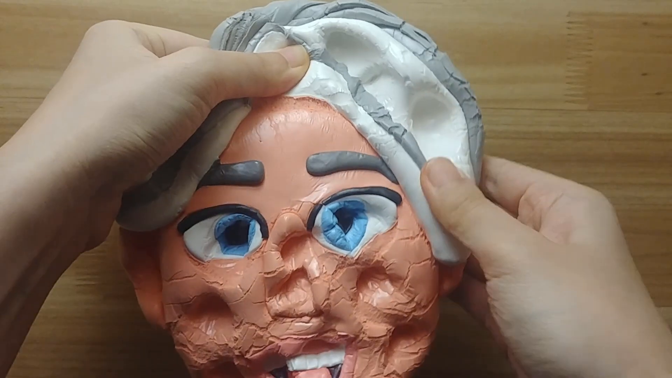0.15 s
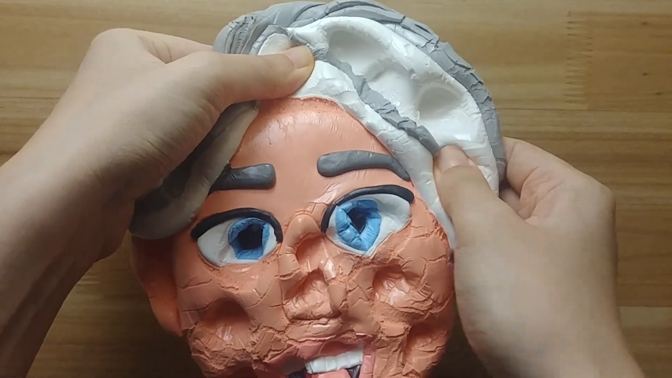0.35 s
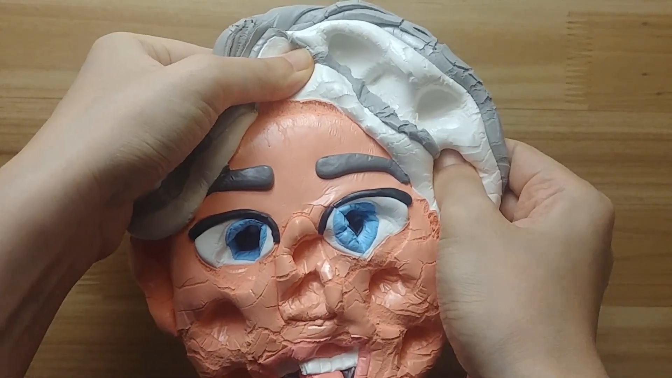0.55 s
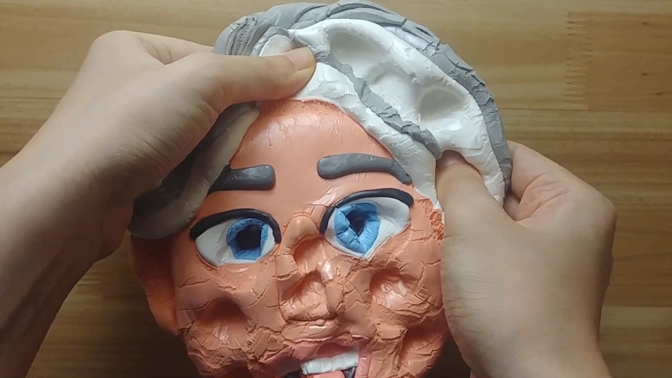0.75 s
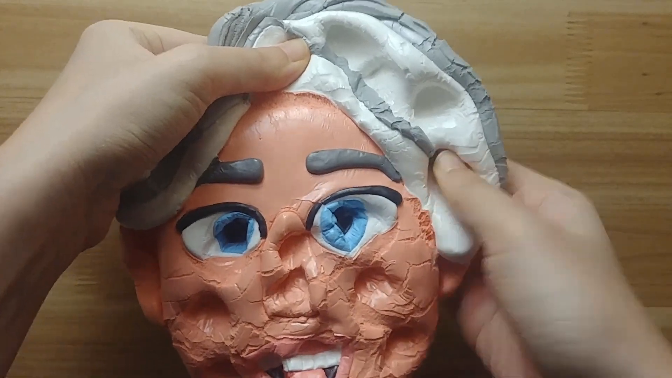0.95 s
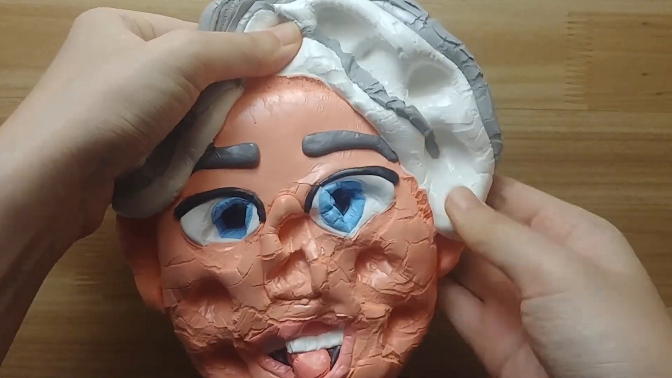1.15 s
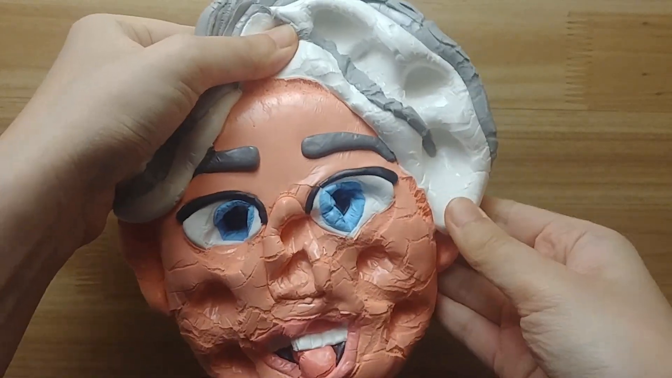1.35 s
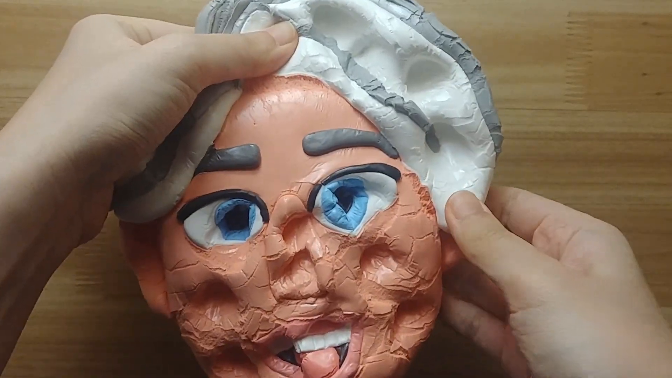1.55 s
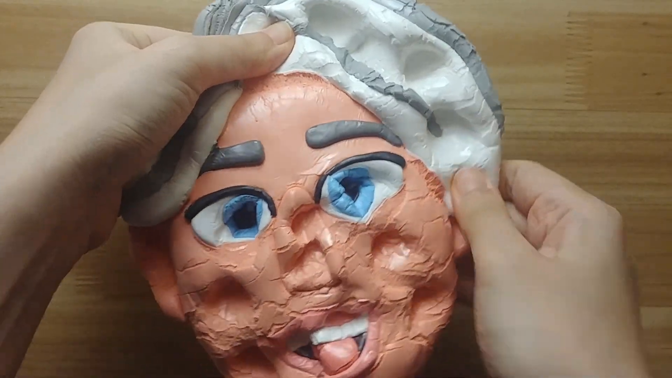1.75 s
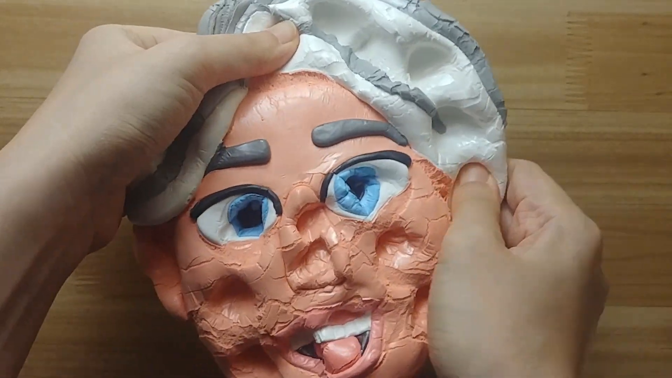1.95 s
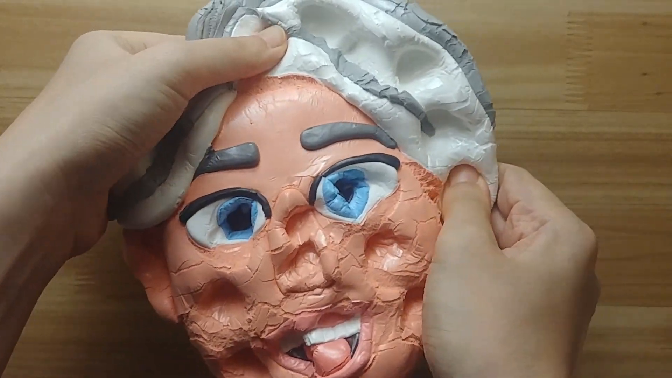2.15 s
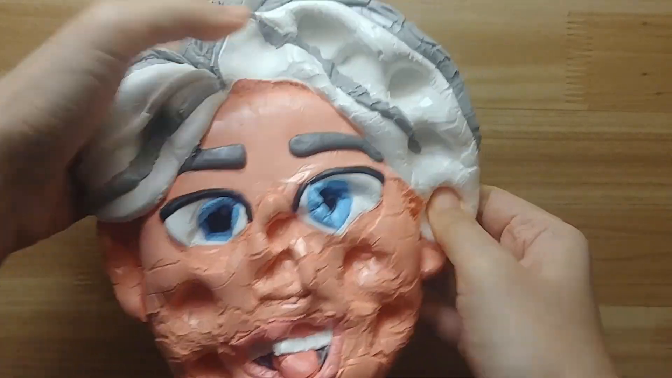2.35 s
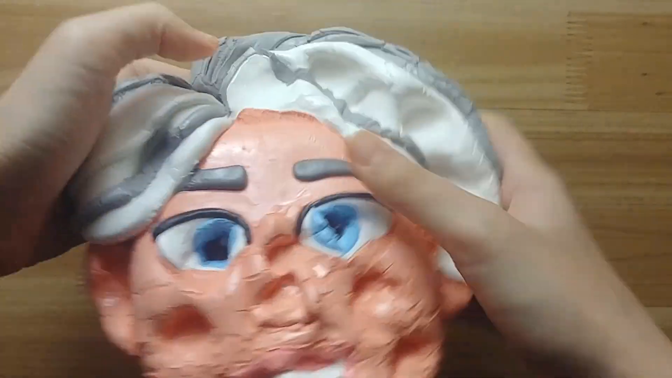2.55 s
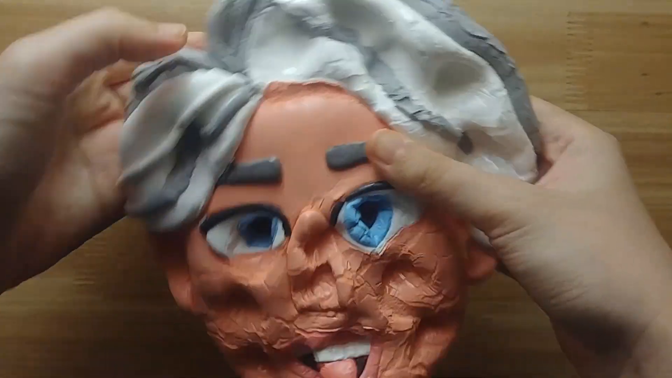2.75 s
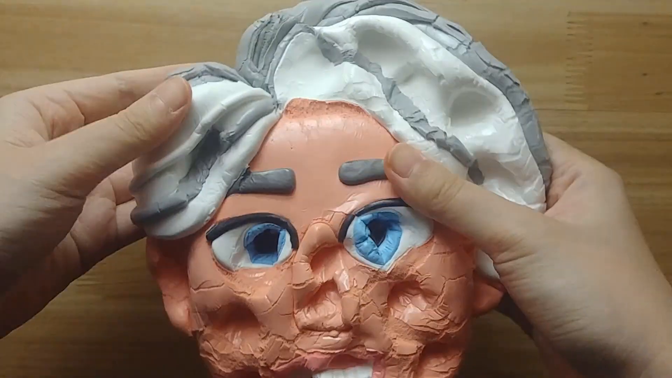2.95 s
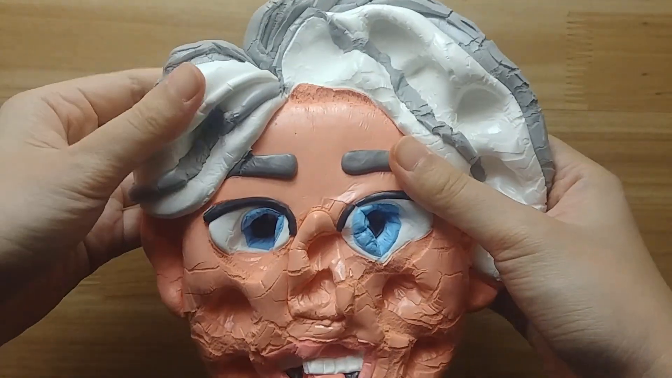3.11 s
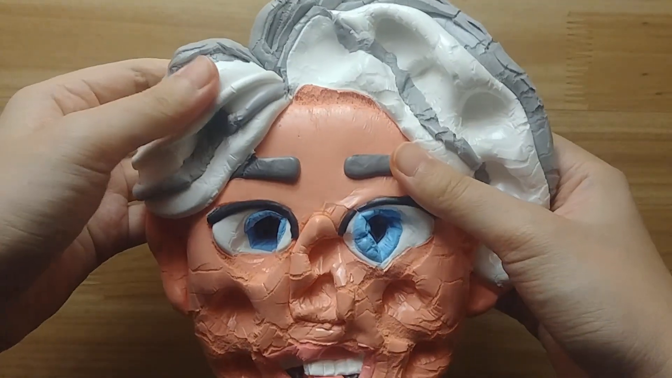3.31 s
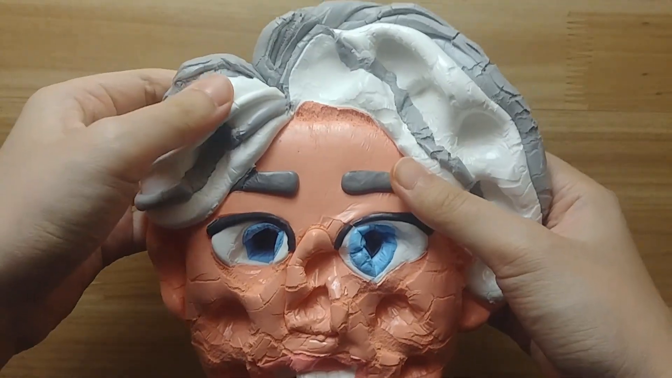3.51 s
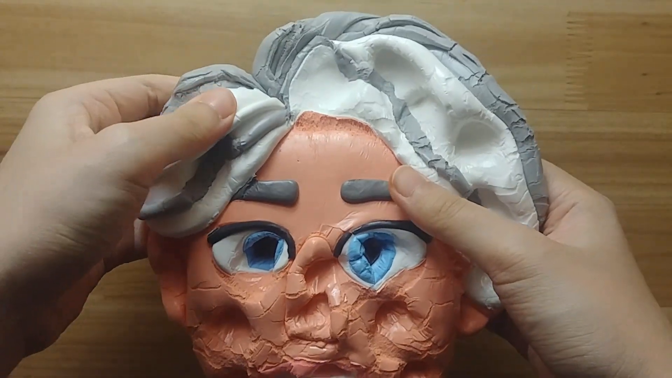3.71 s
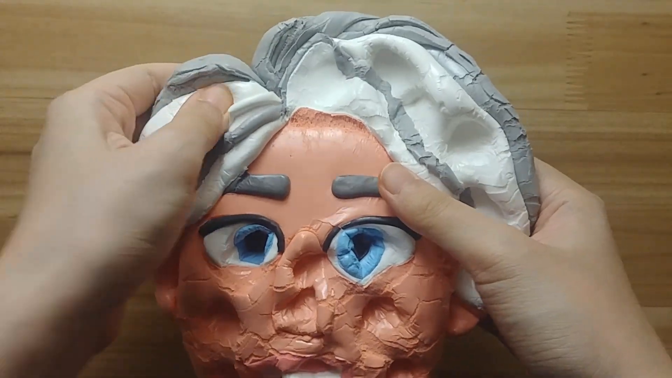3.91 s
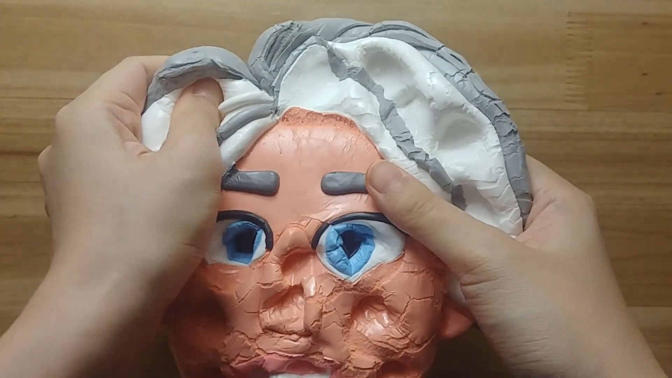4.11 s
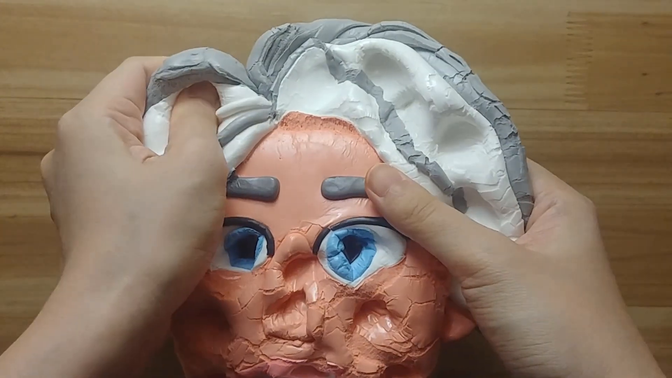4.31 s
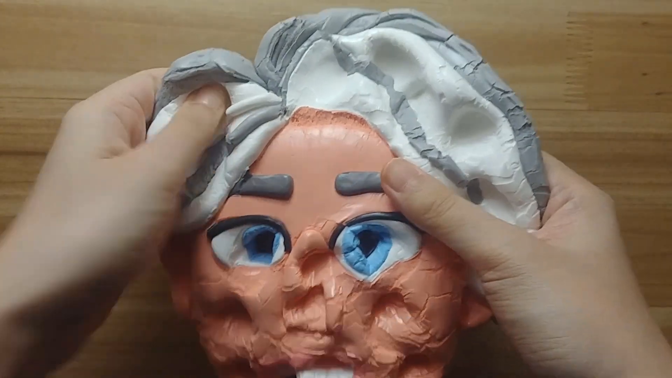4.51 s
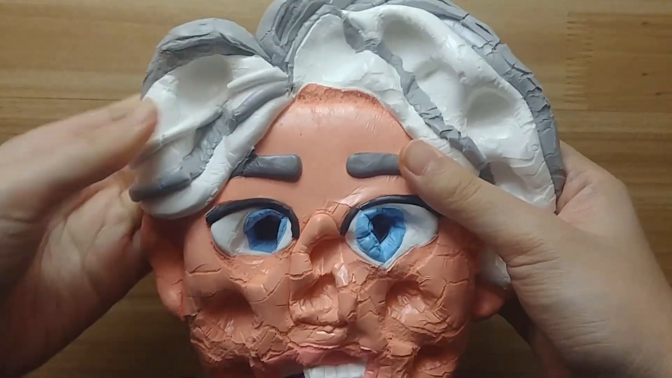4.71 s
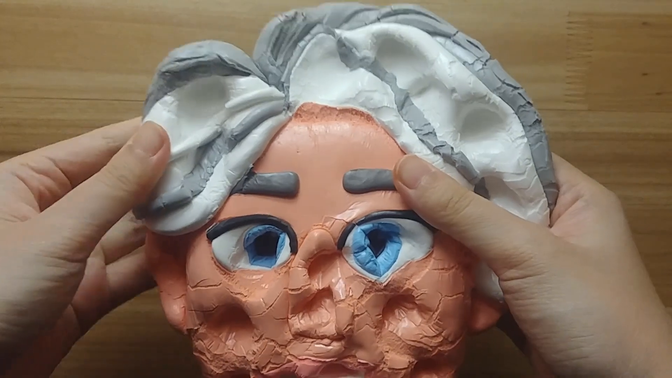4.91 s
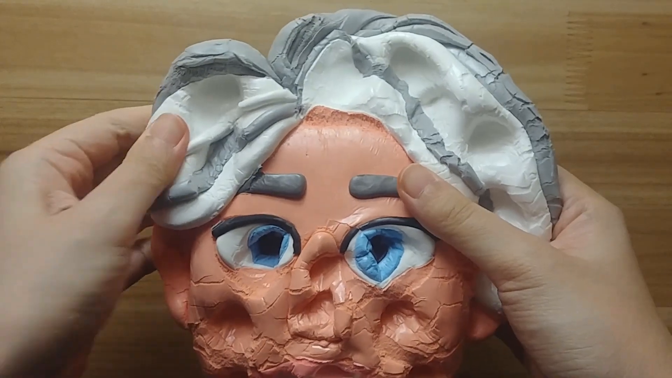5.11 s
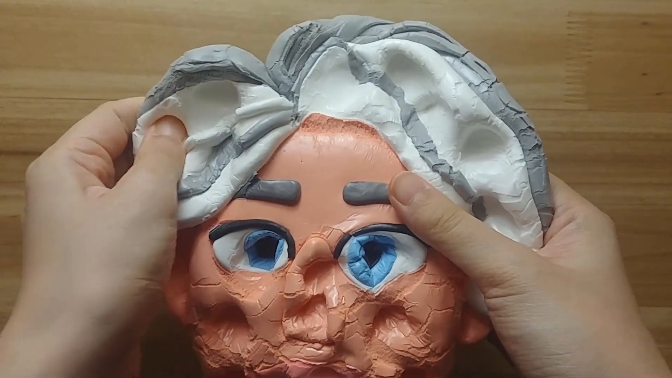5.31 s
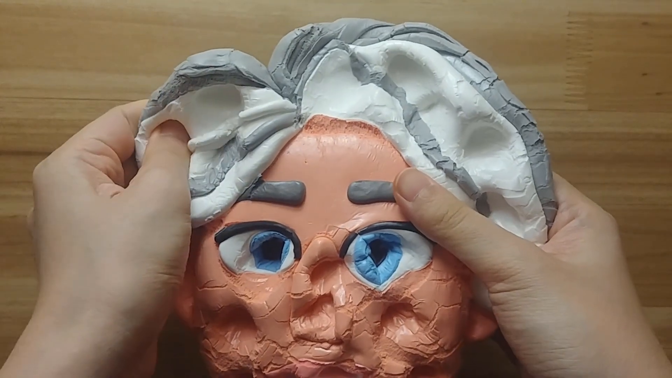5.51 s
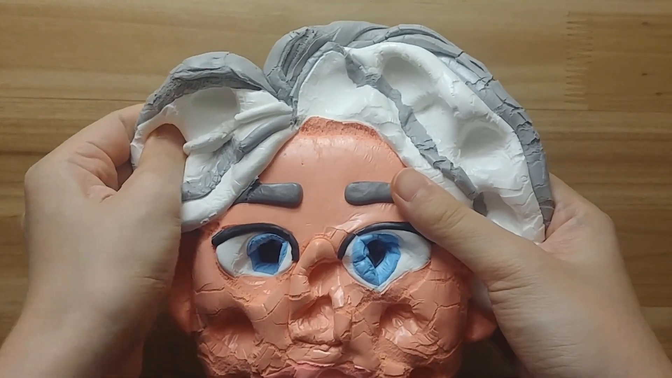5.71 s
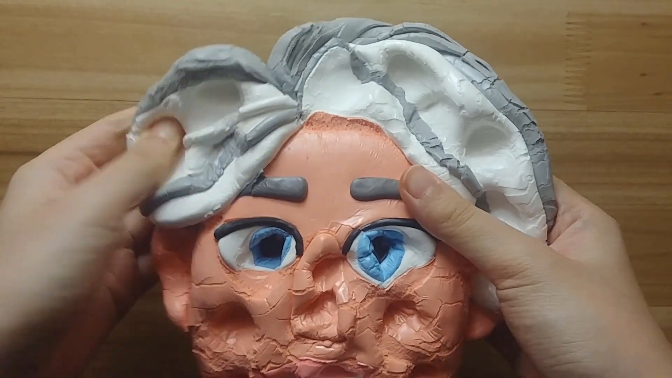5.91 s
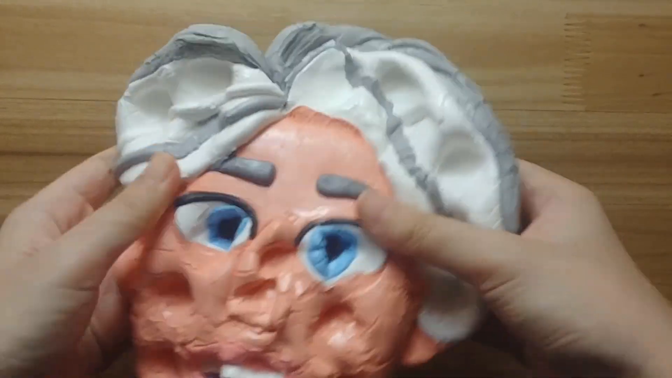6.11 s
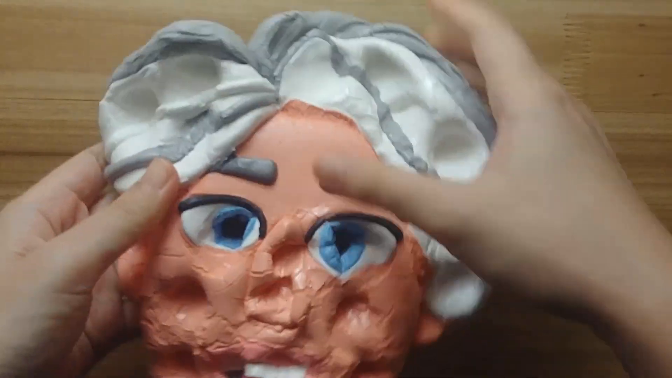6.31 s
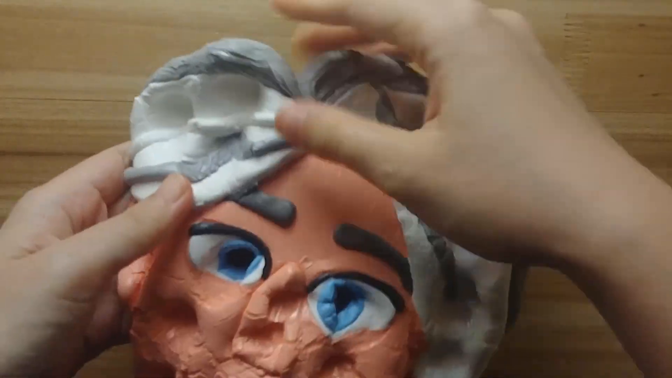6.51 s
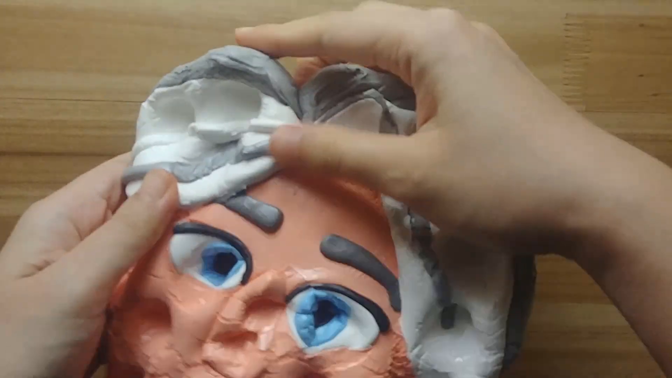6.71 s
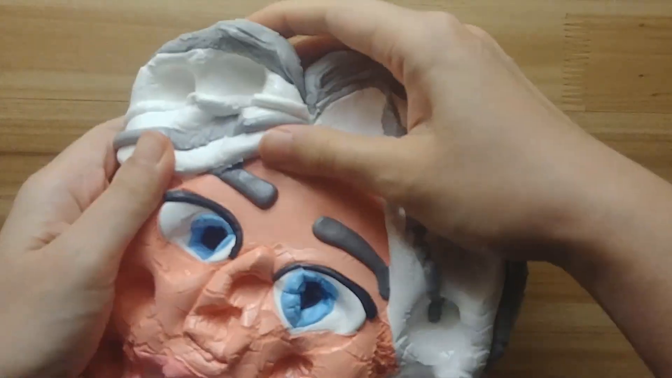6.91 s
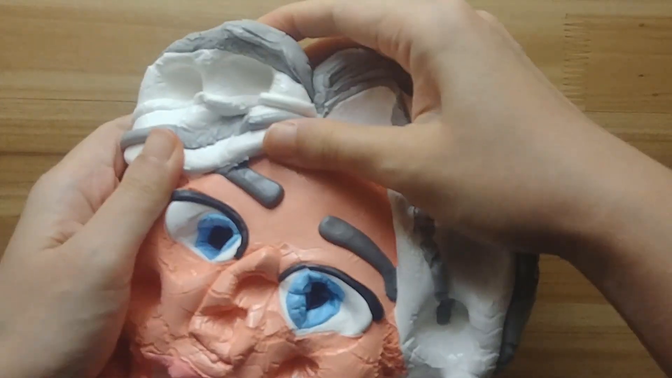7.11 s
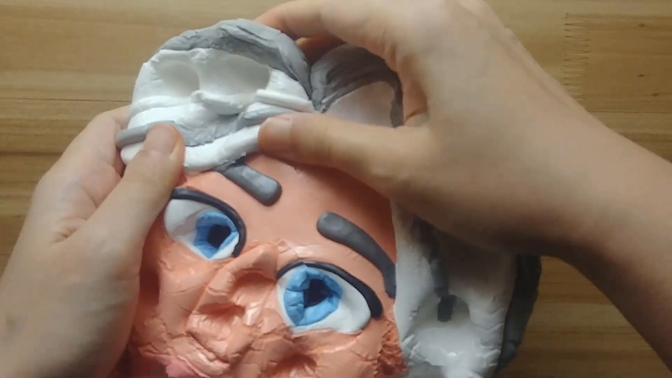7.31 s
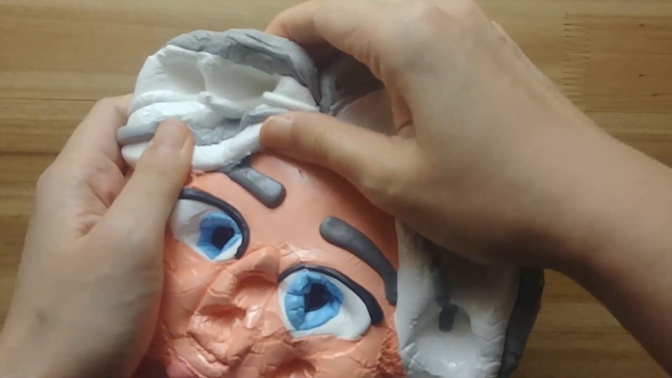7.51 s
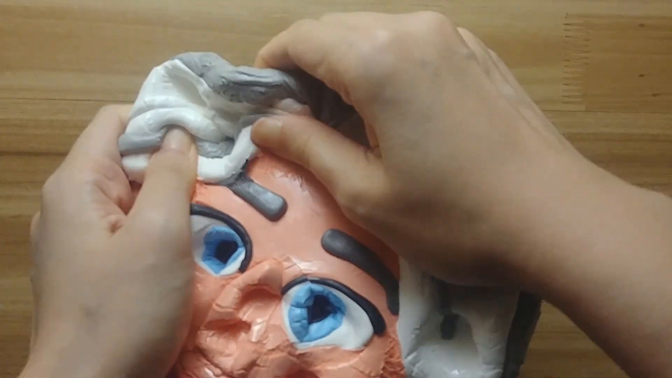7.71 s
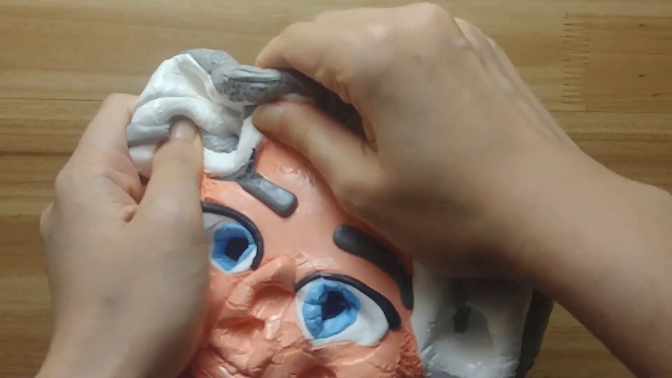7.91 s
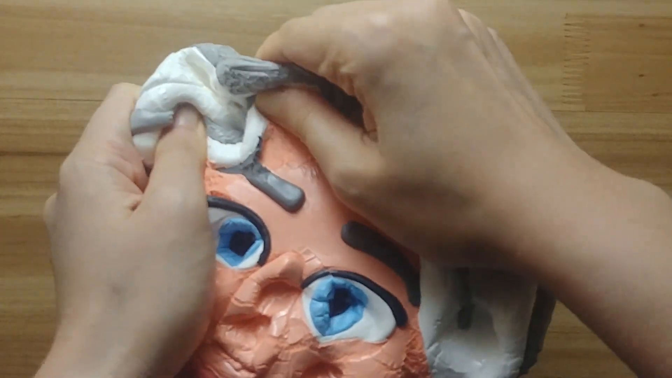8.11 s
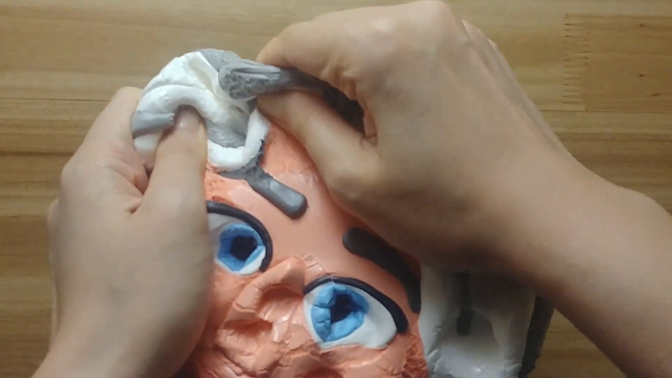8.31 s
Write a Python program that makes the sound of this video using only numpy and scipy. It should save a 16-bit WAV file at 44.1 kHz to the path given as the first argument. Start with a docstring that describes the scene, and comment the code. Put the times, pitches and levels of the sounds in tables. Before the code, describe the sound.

Brittle hardened clay cracks sharply under pressing thumbs, loud first burst then weaker ones, over a faint low rumble in a small room.

```python
"""Cracking a dry clay crust

Thumbs press in the hardened crust of a soft clay head on a wooden table, in five squeezes.
Each crack is a snap and a short run of tiny fractures; it rings the crust, scatters off hands and table
and dies in a small room. Crumbs crackle in between.
Low thuds of the overloaded recorder go with the heaviest cracks.
Between squeezes the sound is cut to a faint rumble with a little hiss."""
import sys
import numpy as np
from scipy import signal
from scipy.fft import rfft, irfft
from scipy.io import wavfile
from scipy.ndimage import uniform_filter1d

SR = 44100
rng = np.random.default_rng(int(sys.argv[2]) if len(sys.argv) > 2 else 0)


def unload_audio(sound):
    """Save the sound as a 16-bit wav file, at the path given as the first command line argument."""
    columns = np.transpose(np.atleast_2d(sound))
    # keep every value between -1 and 1, then stretch to whole-number steps
    steps = np.round(np.clip(columns, -1, 1) * 32767)
    wavfile.write(sys.argv[1], SR, steps.astype(np.int16))


N = 368235  # length in samples
SIZE = 4096  # samples in one crack, tick or thud
HZ = np.arange(SIZE // 2 + 1) * SR / SIZE + 1  # never zero, so its logarithm exists
AGE = np.arange(SIZE) / SR  # seconds

# The squeezes, each at another spot of the crust:
# start_s, end_s, lowest note of the flakes (lowest_hz), resonance of the spot (spot_hz, spot_width_hz,
# spot_lift_db), body of the flakes (body_db), their fizz (fizz_db), ring of the small cracks (ring_db)
SQUEEZE_SPOTS = [(0.105, 0.57, 954, 2206, 700, 2, 2.5, -0.5, 3),
                 (1.543, 1.905, 1144, 2040, 700, 2.5, 0, 1.5, 0),
                 (3.738, 4.14, 916, 2210, 550, 4.5, 4, 2, -10),
                 (5.138, 5.44, 1070, 4820, 2203, 5, 5.5, 5, 1.5),
                 (7.633, 8.208, 1343, 4760, 2810, 3.5, 9, -4, -1)]


def squeezing():
    """One during a squeeze, zero in the pauses, with edges smoothed over about 2 ms."""
    t = np.arange(N) / SR
    pressed = sum(1. * ((t > start) & (t < end)) for start, end, *_ in SQUEEZE_SPOTS)
    return uniform_filter1d(pressed, size=88)


# The cracks that stand out:
# start_s, level_db before room and left/right balance, length of the fracture run (run_ms),
# ring of the hollow shell (ring_db)
BIG_CRACKS = [(0.1053, -38, 2, 3.5), (0.1296, -8.5, 2.89, 23), (0.148, -18.5, 2.2, 10), (0.182, -29, 3, -8),
              (0.1899, -11.5, .6, 21.5), (0.1976, -3.5, 2.34, 6), (0.2074, -12.5, 5, 3),
              (0.2312, -8.5, 2.38, 14), (0.2472, -13.5, .7, 21), (0.2646, -15, 4, 12),
              (0.2715, -7.5, 0.85, 0), (0.301, -15.5, 0.86, 17), (0.3109, -14, 2.8, -3.5),
              (0.3206, -14.5, 0.44, -5), (0.3548, -25.5, 4.6, 10), (0.441, -23.5, 0.598, -9),
              (0.4543, -21, 1.4, 12), (0.4629, -5.5, 2.2, 6.5), (0.538, -32.5, 4.2, -1),
              (1.5698, -24.5, 0.55, 12), (1.577, -22.5, 0.54, 8.5), (1.5902, -19, 0.5, 5.5),
              (1.5998, -24, .5, 1), (1.623, -17, 0.44, -2), (1.6396, -8.5, 1.98, 2),
              (1.6833, -15.5, 0.49, -6), (1.7015, -18, 1, -5), (1.7164, -19.5, 4.7, -8),
              (1.745, -17, 0.34, 4), (1.763, -10.5, 1.2, -6), (1.769, -4, 1.6, 3), (1.777, -10.5, 2.7, 2),
              (1.789, -17.5, 2.2, -1), (1.87, -19, 1.35, -8), (1.8946, -27.5, 0.49, -8.5),
              (3.7454, -31, 3, -17.5), (3.7707, -13, 3, -1.5), (3.8161, -8, 2.8, -4.5),
              (3.867, -10, 1.4, -9.5), (3.882, -14, 0.58, -1), (3.897, -14, 1.02, -8), (3.936, -23, 1, -8),
              (3.954, -10.5, 3.8, 3.5), (3.974, -16.5, 3.1, -11), (4.0342, -28.5, 1.44, 1),
              (4.0503, -33, 3, -10), (4.0695, -31, .5, -13), (4.086, -28, 0.93, -16),
              (5.142, -21, 0.65, -5), (5.1534, -27, 1, 2), (5.164, -18, 1.4, 4), (5.172, -21, 3, 7.5),
              (5.2055, -22.5, 0.56, -6), (5.2422, -16, 1.96, 3), (5.2704, -13, 2.4, -6.5),
              (5.295, -15.5, 0.78, 0), (5.3311, -22.5, 0.58, -0.5), (5.3619, -19, 1.6, 5.5),
              (5.3855, -20.5, 0.56, -5), (7.667, -35.5, .3, -25), (7.698, -29.5, 0.71, -4),
              (7.7239, -33, 4.4, 5), (7.7566, -13, 0.66, 1), (7.7765, -25, .9, 6), (7.8002, -33, 1.2, -12),
              (7.8889, -27, 3.93, 6), (7.9266, -27.5, 2.06, -13), (7.956, -37, 3, 1),
              (8.0166, -32.5, 4.74, 4), (8.0305, -33, 2.9, 2), (8.096, -34, 1.8, 0.5), (8.147, -36, 4.3, 4),
              (8.1726, -33.5, 3.34, 2.5)]


def big_cracks(start, end):
    """The outstanding cracks that belong to one squeeze."""
    return [crack for crack in BIG_CRACKS if start - .1 < crack[0] < end + .1]


TYPICAL_DB, TYPICAL_RUN_MS = -18, 1.6  # a middling crack


def small_cracks(start, end, crumbling, ring_db, per_second=60, level_db=-0.5, spread_db=2):
    """Lesser cracks at uneven intervals, as strong as the crumbling allows: rows like the big ones."""
    count = int((end - start) * per_second)
    place, size, run = rng.random((count, 3)).T
    s = start + (np.arange(count) + place) * (end - start) / count
    db = np.interp(s, *np.transpose(crumbling)) + level_db + spread_db * (2 * size - 1)
    run_ms = TYPICAL_RUN_MS * 2 ** (2 * (2 * run - 1))  # a quarter to four times the typical run
    return list(zip(s, db, run_ms, np.full(count, ring_db)))


def cracks(colour, events, flakes, pan_scatter_db=1.0):
    """The cracks of one squeeze: each fracture rings its flake and the crust, and scatters."""
    out = np.zeros((2, N))
    attack = int(.006 * SR)  # the level is set over the first 6 ms
    for s, db, run_ms, ring_db in events:
        response = causal(colour + flake_colour(db, run_ms, ring_db, *flakes))
        snap = irfft(rfft(fracture(run_ms)) * rfft(scatter()) * response)
        snap /= np.sqrt(np.mean(snap[:, :attack] ** 2))
        side_db = pan_scatter_db * rng.standard_normal() * np.array([[1], [-1]])
        add(out, s, snap * undb(db + side_db))
    return out


def fracture(run_ms, step_size=0.54, give_ms=.3, count=24):
    """The crust starts to give, snaps, then runs on in small jumps; a long run takes more of the energy."""
    force = np.zeros(SIZE)
    per_ms = SR / 1000
    delays = np.minimum(rng.exponential(1, count), 3) * run_ms * per_ms
    force[delays.astype(int)] = unit(rng.standard_normal(count)) * step_size * run_ms
    force[int(give_ms * per_ms)] += 1  # the snap itself
    return force


def flake_colour(db, run_ms, ring_db, lowest_hz, body_db, fizz_db,
                 ring_hz=2720, ring_width=1200, ring_scatter=.04):
    """Each flake's own colour (dB): wide ones have more body; those over a hollow ring at their own pitch."""
    # louder cracks and longer runs free wider flakes
    body_db = body_db + 0.17 * (db - TYPICAL_DB)
    body_db = body_db + 3.5 * np.log2(run_ms / TYPICAL_RUN_MS)
    # body and fizz differ by about 2 dB from flake to flake
    body_db, fizz_db = np.array([body_db, fizz_db]) + 2 * rng.standard_normal(2)
    flake = contour([(0.71 * lowest_hz, 0), (lowest_hz, body_db), (1600, body_db),
                     (2400, 0), (6500, 0), (12000, fizz_db)], HZ)
    own_ring_hz = ring_hz * (1 + ring_scatter * rng.standard_normal())
    return flake + bump(own_ring_hz, ring_width, ring_db)


# Spectrum of a crack: pitch_hz, level_db
CRUST_SPECTRUM = [(60, -32.5), (300, -21.5), (680, -21), (900, -12.5), (1400, -14), (2100, -5), (2500, 0.5),
                  (3800, -1), (6000, 1.5), (8700, 0.5), (9600, -9), (10700, -19), (12500, -8.5),
                  (15500, -6)]
# Resonances of the crust: pitch_hz, width_hz, lift_db
CRUST_RINGS = [(1180, 180, 0), (1620, 72, 0.5), (2758, 140, 4), (3274, 220, 2.5), (4160, 71, 2)]
# Resonances of the microphone ports, left then right: pitch_hz, width_hz, lift_db
MICROPHONE_PORTS = [(7690, 1100, 10.5), (8220, 440, 7)]


def crust_colour():
    """The crust's spectrum and resonances, as each microphone port hears them (dB)."""
    crust = contour(CRUST_SPECTRUM, HZ) + sum(bump(*ring) for ring in CRUST_RINGS)
    return crust + np.array([bump(*port) for port in MICROPHONE_PORTS])


# Crumbling under the cracks, one curve for each squeeze; small cracks and crumbs follow it:
# time_s, level_db (a guide that each of them offsets)
CRUMBLING_CURVES = [
    [(0.106, -44), (0.16, -32), (0.21, -22.5), (0.3, -24.5), (0.35, -28), (0.43, -35), (0.49, -29),
     (0.55, -54)],
    [(1.548, -51), (1.59, -32), (1.65, -32.5), (1.78, -28), (1.84, -45), (1.9, -41)],
    [(3.736, -44), (3.79, -29), (3.87, -33), (3.97, -31), (4.02, -37), (4.08, -40), (4.13, -49)],
    [(5.134, -27.5), (5.17, -31.5), (5.22, -36.5), (5.28, -29), (5.34, -38.5), (5.38, -30), (5.43, -45.5)],
    [(7.631, -62.5), (7.73, -31.5), (7.78, -36), (7.84, -46), (7.9, -32.5), (7.95, -42.5), (8, -55),
     (8.2, -53)],
]


def crumbs(colour, start, end, crumbling, crumb_db=9, per_second=420, spread_db=4.0, body_db=-2):
    """Tiny ticks of uneven size that follow the crumbling."""
    out = np.zeros((2, N))
    response = causal(colour + contour([(1200, body_db), (4000, 0.0075)], HZ))
    for place, size in rng.random((int((end - start) * per_second), 2)):
        s = start + place * (end - start)
        tick = unit(irfft(rfft(scatter()) * response))
        size_db = crumb_db - spread_db * np.log(max(1 - size, .04))  # a few are much bigger
        add(out, s, tick * undb(np.interp(s, *np.transpose(crumbling)) + size_db))
    return out


# Low thuds of the overloaded recorder, with the heaviest cracks:
# start_s, level_db on the left before room and balance
OVERLOAD_THUDS = [(0.133, -19.5), (0.1986, -10.5), (0.2729, -5), (0.463, -2.5), (1.768, -18),
                  (3.818, -22.5), (3.954, -23), (7.7585, -18)]


def overload_thuds(right_db=-9):
    """Short and low, mostly on the left: a scattered click with little left above 1 kHz."""
    out = np.zeros((2, N))
    response = causal(contour([(40, -5.5), (150, 0.0), (450, -5.0), (700, -3.5),
                               (1500, -18), (6000, -45.0)], HZ))
    for s, db in OVERLOAD_THUDS:
        thud = unit(irfft(rfft(scatter()) * response))
        add(out, s, thud * undb([[db], [db + right_db]]))
    return out


def scatter(decay_s=0.0048, scatter_db=3.5, far_decay_s=.014, far_db=-21):
    """The straight path, a quick spray of reflections from hands and clay, a slower one from the table."""
    fade = np.exp(-AGE / decay_s) + undb(far_db) * np.exp(-AGE / far_decay_s)
    spray = stereo_noise(SIZE, alike_hz=3560, alike=0.52) * fade
    paths = unit(spray) * undb(scatter_db)
    # the straight path reaches each side after 0 to 5 samples
    paths[[0, 1], rng.choice(np.arange(6), size=2)] += 1
    return paths


def room(x, t60_s=0.17, treble_t60_s=0.15, room_db=-8, build_s=.005):
    """A small furnished room: a tail of noise falls 60 dB in each t60, and the treble dies first."""
    t = np.arange(4 * SIZE) / SR
    low_filter = signal.butter(2, 5000, fs=SR, output="sos")
    high_filter = signal.butter(2, 5000, "high", fs=SR, output="sos")
    low = signal.sosfilt(low_filter, stereo_noise(len(t), alike_hz=2497, alike=.3))
    high = signal.sosfilt(high_filter, rng.standard_normal(low.shape))
    fall_db = -60 * t
    tail = low * undb(fall_db / t60_s) + high * undb(fall_db / treble_t60_s)
    tail *= 1 - np.exp(-t / build_s)  # reflections build up first
    return undb(room_db) * signal.fftconvolve(x, unit(tail), axes=1)[:, :N]


# Shape of the background spectrum: pitch_hz, level_db (per Hz, relative)
RUMBLE_SPECTRUM = [(15, -65), (25, -33.5), (32, -28), (41, -15), (56, -5), (96, 0.5), (113, -1),
                   (133, -6.5), (183, -8), (253, -10), (469, -14), (1140, -20.5), (4620, -25.5),
                   (10100, -34), (15500, -32.5)]


def background(level_db=-56.5, left_db=0.73, low_cut_hz=36):
    """A steady low rumble with faint hiss: noise shaped by a spectrum."""
    hz = np.arange(N // 2 + 1) * SR / N + 1
    gain = undb(contour(RUMBLE_SPECTRUM, hz)) / (1 + (low_cut_hz / hz) ** 6)
    noise = irfft(rfft(stereo_noise(N, alike_hz=2960, alike=0.19)) * gain, N)
    return noise / noise.std() * undb(level_db + np.array([[left_db], [-left_db]]))


def undb(db):
    """Decibels to gain."""
    return 10 ** (np.asarray(db) / 20)


def unit(x):
    """Scale to an energy of one in each channel."""
    return x / np.sqrt(np.sum(x ** 2, axis=-1, keepdims=True))


def contour(points, hz):
    """Join (Hz, dB) points on a log-frequency axis."""
    f, db = np.transpose(points)
    return np.interp(np.log(hz), np.log(f), db)


def bump(hz, width, db):
    """A resonance as a lift in dB."""
    return db / (1 + (2 * (HZ - hz) / width) ** 2)


def causal(db):
    """Minimum-phase frequency response of a dB curve: the ringing comes after the hit, never before."""
    cepstrum = irfft(db * np.log(10) / 20)
    cepstrum[..., 1:SIZE // 2] *= 2
    cepstrum[..., SIZE // 2 + 1:] = 0
    return np.exp(rfft(cepstrum))


def add(out, s, sound):
    """Mix a stereo sound in at time s."""
    i = int(s * SR)
    out[:, i:i + sound.shape[1]] += sound[:, :N - i]


def stereo_noise(count, alike_hz, alike):
    """Noise that is partly the same left and right, mostly below alike_hz."""
    hz = np.arange(count // 2 + 1) * SR / count
    share = np.clip(alike, 0, .98) / (1 + (hz / alike_hz) ** 2)
    shared, left, right = rfft(rng.standard_normal((3, count)))
    return irfft(np.sqrt(share) * shared + np.sqrt(1 - share) * np.array([left, right]), count)


def scene(left_db=1.0, right_db=-2.5):
    """Five squeezes, a little nearer the left microphone, over the background."""
    sounds = overload_thuds()
    for spot, crumbling in zip(SQUEEZE_SPOTS, CRUMBLING_CURVES):
        start, end, lowest_hz, spot_hz, spot_width, spot_db, body_db, fizz_db, ring_db = spot
        colour = crust_colour() + bump(spot_hz, spot_width, spot_db)
        events = big_cracks(start, end) + small_cracks(start, end, crumbling, ring_db)
        sounds = sounds + cracks(colour, events, (lowest_hz, body_db, fizz_db))
        sounds = sounds + crumbs(colour, start, end, crumbling)
    heard = (sounds + room(sounds)) * squeezing()
    return heard * undb([[left_db], [right_db]]) + background()


def record(dry):
    """The loudest snaps overload the recorder and clip; the top is cut above 15800 Hz."""
    low_pass = signal.ellip(12, .2, 80, 15800, fs=SR, output="sos")
    return signal.sosfilt(low_pass, np.clip(dry, -1, 1))


dry = scene()
out = record(dry)
unload_audio(out)
```